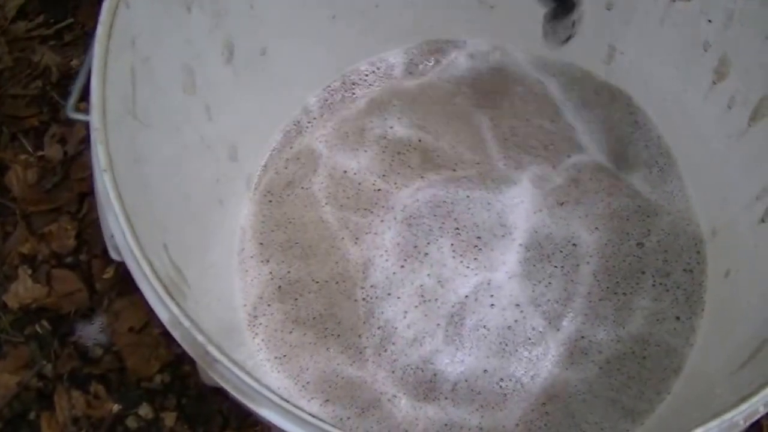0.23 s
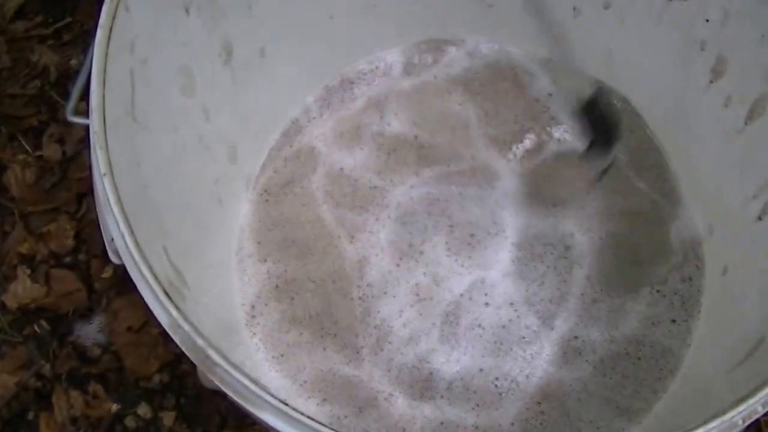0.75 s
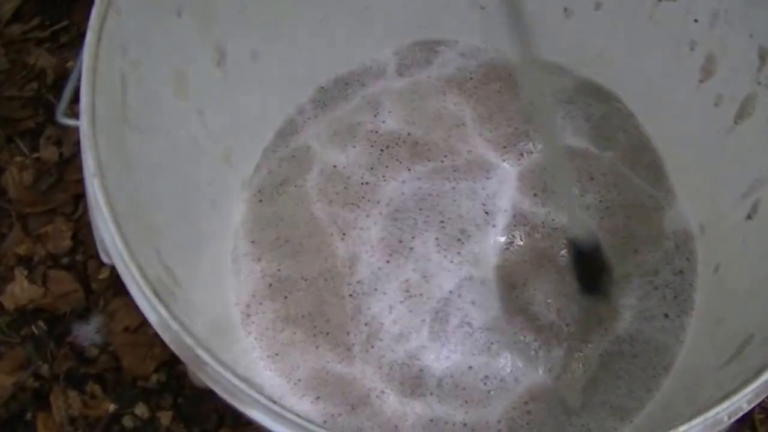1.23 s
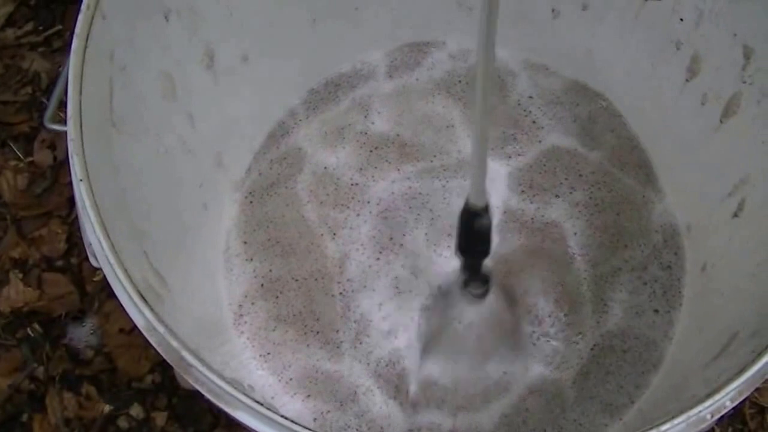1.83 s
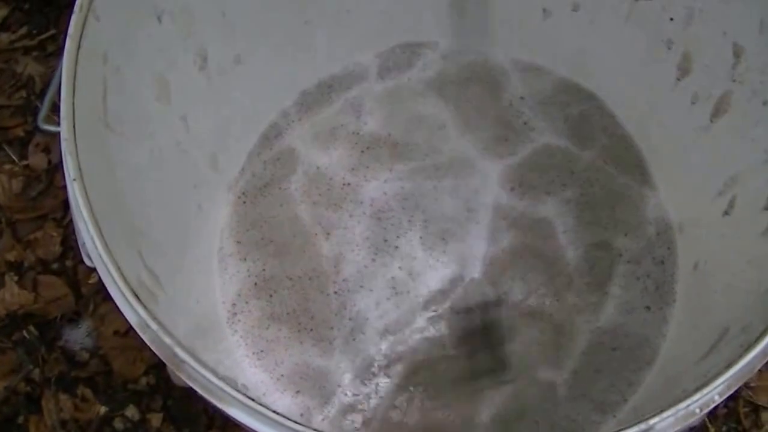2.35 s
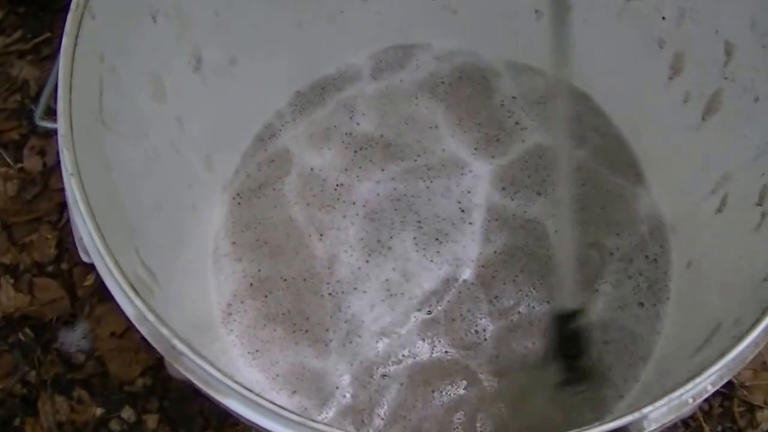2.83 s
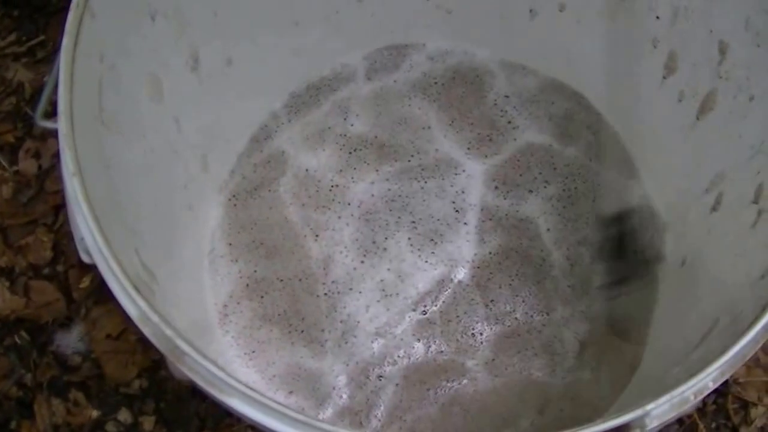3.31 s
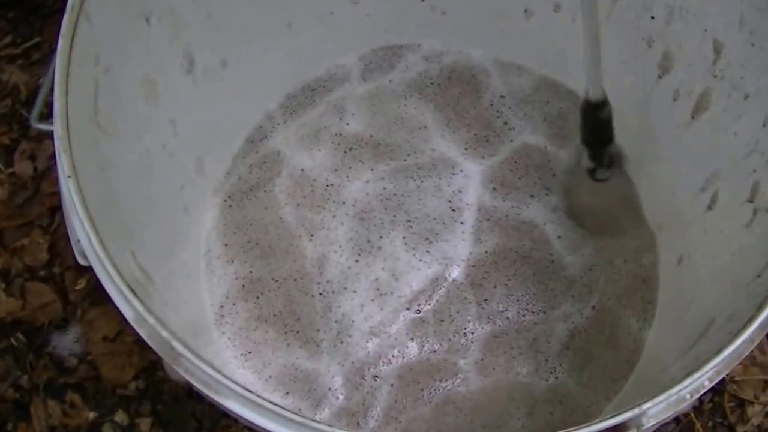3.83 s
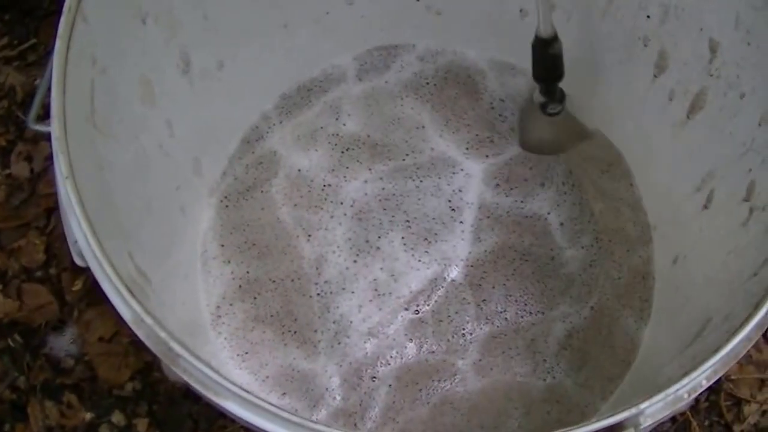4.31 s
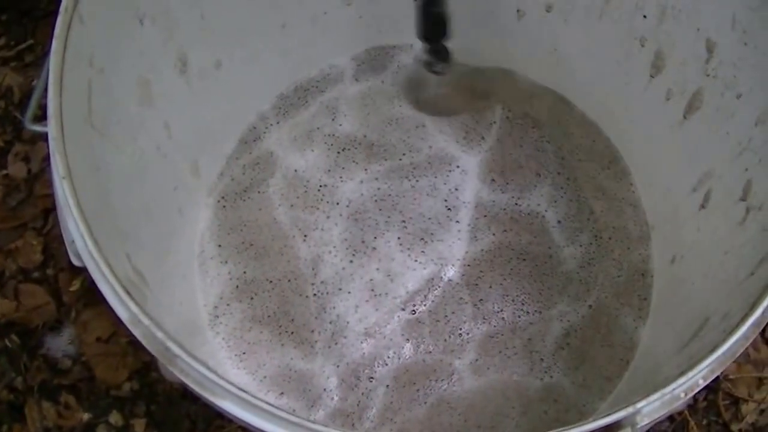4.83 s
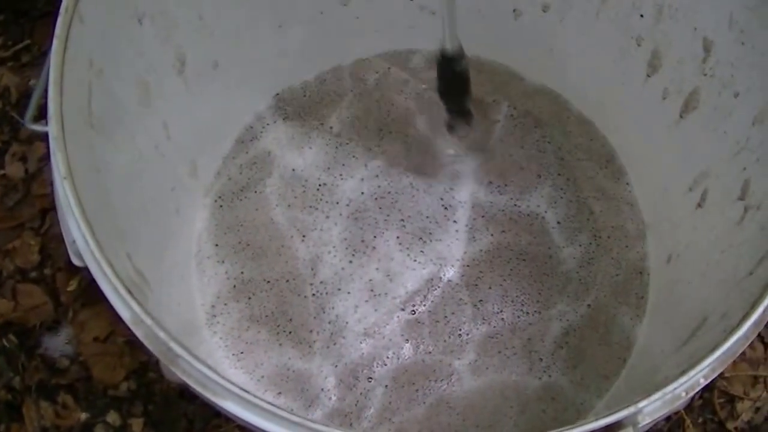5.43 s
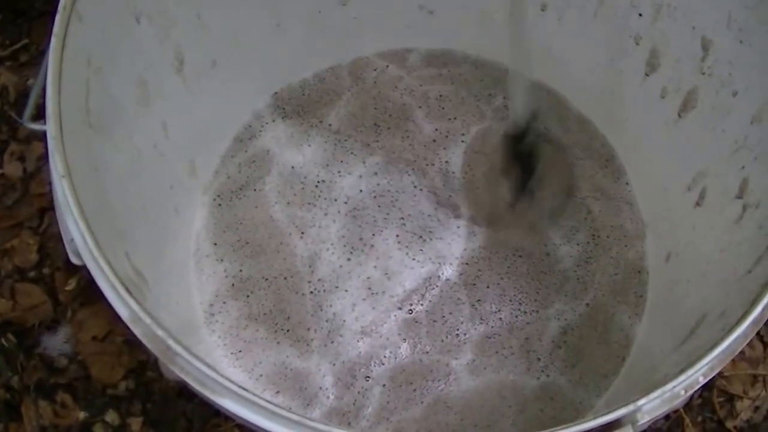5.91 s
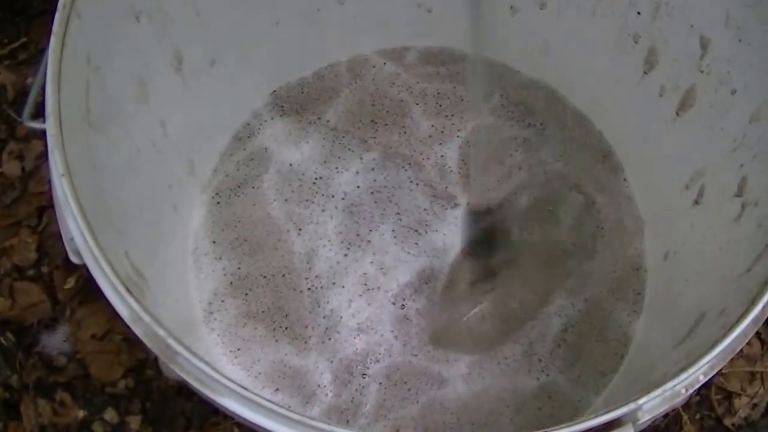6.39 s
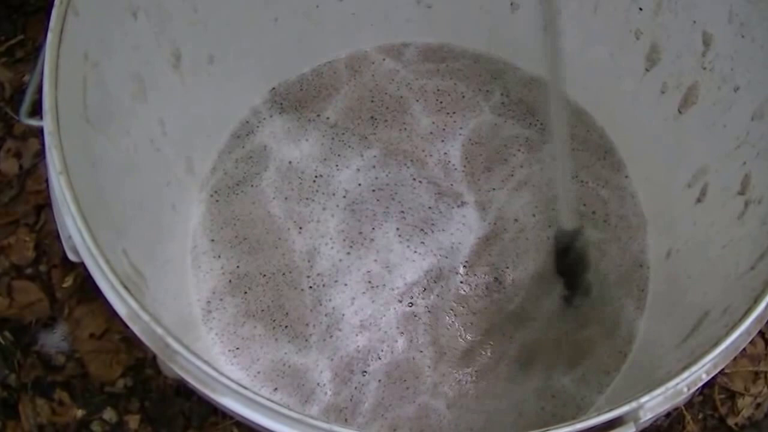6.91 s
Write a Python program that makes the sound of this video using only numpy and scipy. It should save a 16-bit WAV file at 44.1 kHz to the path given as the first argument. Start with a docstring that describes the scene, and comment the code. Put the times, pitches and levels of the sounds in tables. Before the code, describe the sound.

A sprayer jet hisses steadily into frothy water in a plastic bucket, cuts briefly to a spitting leak, then resumes and finally pulses.

```python
"""A pressure sprayer's jet hisses into frothy water in a plastic bucket: drop noise split into four zones of pitch.
The jet digs hollows that resonate as it wanders; its valve shuts to a weak, spitting leak for half a second, then reopens.
Bubbles ring as decaying sines; knocks of the wand ring wall modes; thuds and slaps are bursts of band noise.
At the end the hand shakes the wand, so the hiss swells 6.66 times a second. Quiet outdoor air lies behind."""
import sys
import numpy as np
from scipy import signal
from scipy.fft import rfft, irfft, next_fast_len
from scipy.io import wavfile
from scipy.ndimage import uniform_filter1d, map_coordinates

SR = 44100
rng = np.random.default_rng(int(sys.argv[2]) if len(sys.argv) > 2 else 0)


def bounce(signal):
    """Save signal as a 16-bit WAV file at the path given by the first command-line argument."""
    frames = np.transpose(np.atleast_2d(signal))
    limited = np.clip(frames, -1, 1)
    pcm = np.round(limited * 32767).astype(np.int16)
    wavfile.write(sys.argv[1], SR, pcm)


N = 315315


def amp(db):
    """Decibels to gain."""
    return 10 ** (np.asarray(db) / 20)


def unit(x):
    """Scale to rms 1."""
    return x / np.sqrt(np.mean(x ** 2) + 1e-20)


def along(points, hz):
    """(Hz, value) points read on a log axis."""
    f, v = np.transpose(points)
    return np.interp(np.log(hz + 1), np.log(f + 1), v)


def curves(rows, t):
    """Each column after the time, read at times t."""
    s, *cols = np.transpose(rows)
    return [np.interp(t, s, c) for c in cols]


def wobble(rate):
    """A smooth random curve, rate knots a second."""
    knots = rng.standard_normal(int(N * rate / SR) + 4)
    return map_coordinates(knots, [np.arange(N) * rate / SR])


def filtered(x, response):
    """x times a response of frequency."""
    m = next_fast_len(N + 8192)
    return irfft(rfft(x, m) * response(np.fft.rfftfreq(m, 1 / SR)), m)[..., :N]


def bump(hz, centre, width):
    """A resonance's bell shape, top 1, half at +-width/2."""
    return 1 / (1 + (2 * (hz - centre) / width) ** 2)


def plateau(t, start, end):
    """About 1 from start to end, with soft edges."""
    return np.exp(-((2 * t - start - end) / (end - start)) ** 4)


def burst(envelope, centre_hz, octaves):
    """A puff of noise kept to a band around centre_hz, peak 1."""
    noise = envelope * rng.standard_normal(N)
    x = filtered(noise, lambda hz: bump(np.log2((hz + 1) / centre_hz), 0, octaves) ** 2)
    return x / np.abs(x).max()


# outdoor air spectrum: (frequency [Hz], relative density [dB per Hz])
AIR_SPECTRUM = [(25, -12), (100, 11.5), (200, 16), (280, 28), (600, 37), (2000, -4), (15000, 14.5)]


def outdoors(level_db, rumble_db):
    """A quiet distant rush of air, and a faint rumble that differs between the capsules."""
    air = unit(filtered(rng.standard_normal(N), lambda hz: amp(along(AIR_SPECTRUM, hz))))
    rumble = unit(filtered(rng.standard_normal((2, N)), lambda hz: 1 / (1 + (hz / 220) ** 2)))
    return amp(level_db) * air + amp(rumble_db) * rumble


# rocking of the bucket: (time [s], peak [dB], centre [Hz])
ROCKING_THUDS = [(.137, -56, 292), (.166, -64, 110), (.171, -48, 360), (.283, -50, 450), (1.373, -56, 230),
                 (1.383, -68, 145), (1.424, -62, 191), (1.445, -69, 155), (1.754, -60, 300),
                 (1.883, -48, 500), (1.895, -55, 240)]
THUD_OCTAVES, THUD_RISE_S = 1, 0.0043  # bell width before squaring; time to the envelope's top


def thuds():
    """The full bucket rocks on the ground: soft, low thuds that swell and die."""
    t, out = np.arange(N) / SR, np.zeros(N)
    for s, db, centre_hz in ROCKING_THUDS:
        age = np.maximum(t - s, 0) / THUD_RISE_S
        out += amp(db) * burst(age * np.exp(-age), centre_hz, THUD_OCTAVES)
    return out


# fat drops on the bucket's wall, and at 0.028 s the treble tick of the opening wand knock: (time [s], peak
# [dB], centre [Hz])
WALL_SLAPS = [(.028, -24.5, 2210), (0.054, -24, 4800), (.393, -32, 1150), (.9, -35, 2300),
              (1.726, -27, 5500), (3.053, -34, 5000), (3.862, -37, 2300), (4.343, -30, 2600),
              (5.18, -32, 2300), (5.25, -29, 4600), (5.274, -29, 4600), (5.378, -27, 2700)]
SLAP_DECAY_S, SLAP_OCTAVES = 0.0027, 2.1  # time constant; bell width before squaring


def slaps():
    """Now and then a fat drop lands on the plastic with a short, sharp tick; one such tick also marks the
    opening wand knock."""
    t, out = np.arange(N) / SR, np.zeros(N)
    for s, db, centre_hz in WALL_SLAPS:
        decay = (t > s) * np.exp(-np.abs(t - s) / SLAP_DECAY_S)
        out += amp(db) * burst(decay, centre_hz, SLAP_OCTAVES)
    return out


# wand against bucket: (time [s], gain [dB], deep thump over it [dB], first contact's time constant [s])
WAND_KNOCKS = [(0.0277, -36.5, 15.5, 0.00004), (0.141, -37, -10, .0008), (.169, -31, -14, 0.00035),
               (1.37, -30, -24, 0.00021), (1.429, -39, -15, 0.00016), (1.887, -36, -12, 0.00029),
               (1.903, -33, -15, 0.0003)]
# wall modes: (frequency [Hz], relative level [dB], t60 [s])
WALL_MODES = [(154, -36, 0.09), (240, -33, 0.076), (623, -10, 0.033), (740, -10, 0.089), (900, -1, 0.012),
              (1095, -2, 0.03), (1480, -14, 0.012)]
# modes of the water-loaded base: (frequency [Hz], relative level [dB], t60 [s])
BASE_MODES = [(447, -2.5, 0.049), (520, -15, 0.025)]
BASE_RISE_S = 0.00031  # the heavy base takes a moment to get moving
# the wand chatters: time between contacts, loss and lengthening of each
REBOUND_S, REBOUND_LOSS_DB, REBOUND_SOFTER = 0.0031, 11, 1.8


def ring(modes, t):
    """Sum of decaying modes, each level varied at random by about 1 dB."""
    return sum(amp(db + rng.normal(0, 1) - 60 * t / t60) * np.cos(2 * np.pi * hz * t)
               for hz, db, t60 in modes)


def radiated(x, low_hz, order):
    """Small panels radiate little bass: a high-pass."""
    return signal.sosfilt(signal.butter(order, low_hz, "high", fs=SR, output="sos"), x)


def knocks(count):
    """Each knock swells in the water-loaded base and chatters on the wall, every contact softer and duller."""
    out, t = np.zeros(N + SR), np.arange(SR // 4) / SR
    for s, db, thump_db, contact_s in WAND_KNOCKS:
        wall = radiated(ring(WALL_MODES, t), low_hz=372, order=3)
        swell = 1 - np.exp(-t / BASE_RISE_S)
        base = amp(thump_db) * radiated(ring(BASE_MODES, t) * swell, low_hz=393, order=6)
        for k in range(count):
            push = np.exp(-t / (contact_s * REBOUND_SOFTER ** k))
            struck = wall + (k == 0) * base  # only the first contact moves the base
            blow = signal.fftconvolve(struck, push / push.sum())[:len(t)]
            out[round((s + k * REBOUND_S) * SR):][:len(t)] += amp(db - k * REBOUND_LOSS_DB) * blow
    return out[:N]


# brief squeaks and thin whistles: (start [s], end [s], mean pitch [Hz], mean level [dB])
SQUEAKS = [(0.162, 0.174, 1150, -36), (1.385, 1.485, 2520, -61), (1.424, 1.441, 1080, -48),
           (1.44, 1.494, 1770, -51), (1.474, 1.487, 2330, -53)]


def whistles(waver_hz, flutter_db):
    """The wand and the bucket's air sound in short, unsteady tones."""
    t, out = np.arange(N) / SR, np.zeros(N)
    for start, end, hz, db in SQUEAKS:
        tone = np.sin(2 * np.pi * np.cumsum(hz + waver_hz * wobble(200)) / SR)
        out += amp(db + flutter_db * wobble(130)) * tone * plateau(t, start, end)
    return out


# large bubbles: (time [s], starting pitch [Hz], gain [dB])
LARGE_BUBBLES = [(2.49, 280, -61), (2.635, 330, -52), (2.765, 504, -50), (2.801, 333, -53),
                 (2.855, 490, -46), (2.889, 405, -54), (2.925, 506, -51), (4.042, 260, -63),
                 (4.17, 280, -58)]


def gulps(cycles, rise_per_s):
    """Where the jet digs deep it traps large bubbles, each a low note of slightly rising pitch."""
    out, t = np.zeros(N + SR), np.arange(SR // 12) / SR
    for s, hz, db in LARGE_BUBBLES:
        tone = np.sin(2 * np.pi * hz * t * (1 + rise_per_s * t))
        swell = np.exp(-t * hz / cycles) * (1 - np.exp(-t * hz))
        out[round(s * SR):][:len(t)] += amp(db) * tone * swell
    return out[:N]


def bubbles(count, centre_hz, spread, cycles, level_db):
    """Air driven under by the jet rings as small bubbles of soft start and rising pitch."""
    when = rng.integers(0, N, count)
    pitch, size = rng.standard_normal((count, 2)).T
    hz = np.clip(centre_hz * np.exp(spread * pitch), 400, 7000)[:, None]
    t = np.arange(SR // 40) / SR
    age = t * hz / cycles
    swell = np.exp(-age) * (1 - np.exp(-3 * age))
    tone = np.sin(2 * np.pi * hz * t * (1 + 0.027 * np.minimum(age, 6)))
    rings = amp(8.7 * np.clip(size, -2, 2))[:, None] * swell * tone
    samples = when[:, None] + np.arange(len(t))
    fizz = np.bincount(samples.ravel(), rings.ravel(), N)[:N]
    gain = jet(np.arange(N) / SR)[0]
    return gain * amp(level_db) * unit(fizz)


def drops(rate, size_spread_db, mist_db):
    """Separate drop impacts of random size over countless tiny ones."""
    chance, size, mist = rng.random(N), rng.standard_normal(N), rng.standard_normal(N)
    sign = np.sign(rng.standard_normal(N))
    impacts = (chance < rate / SR) * sign * amp(size_spread_db * np.clip(size, -2, 2))
    return unit(unit(impacts) + amp(mist_db) * mist)


# drops striking the froth: (frequency [Hz], relative density [dB per Hz])
FROTH_SPECTRUM = [(30, -59), (110, -47), (200, -36.5), (400, -25), (700, -11), (1500, -9), (3000, -13),
                  (6500, -9), (10300, -7.5), (12500, -13), (15700, -21.5)]
# air resonances in the bucket: (frequency [Hz], width [Hz], lift [dB])
BUCKET_RESONANCES = [(272, 83, 10), (501, 146, 5), (767, 106, 4), (1060, 460, 5), (1910, 320, 3),
                     (2353, 370, 5), (2996, 740, 5.5), (3485, 390, 5.5), (4736, 1860, 10), (5950, 780, 2.5),
                     (7430, 1200, 2.5)]


def in_bucket(x):
    """The colour of drops on froth, lifted at the bucket's air resonances."""
    def response(hz):
        lift_db = sum(db * bump(hz, c, w) for c, w, db in BUCKET_RESONANCES)
        return amp(along(FROTH_SPECTRUM, hz) + lift_db)
    return unit(filtered(x, response))


# nozzle splutter, and at 0.169 s the treble burst of a wand knock: (time [s], gain [dB], gaussian width [s],
# centre [Hz])
SPLUTTERS = [(.169, -36, 0.0027, 5000), (1.381, -61, .002, 12000), (1.394, -60, .002, 8000),
             (1.428, -56, 0.012, 1100), (1.433, -55, .003, 5500), (1.44, -57, 0.055, 1650),
             (1.4485, -51, 0.0024, 2800), (1.457, -54, .004, 8800), (1.481, -52, .002, 3200),
             (1.608, -49, 0.0034, 1400), (1.682, -40, .003, 2300), (1.763, -43, 0.0045, 2260)]


def spits(spread_octaves):
    """The nozzle splutters: short spurts of coarse drops, each with its own brightness; one such burst also
    marks a wand knock."""
    t, out = np.arange(N) / SR, np.zeros(N)
    coarse = in_bucket(drops(rate=3700, size_spread_db=6, mist_db=1))
    for s, db, width_s, centre_hz in SPLUTTERS:
        spurt = unit(filtered(coarse, lambda hz: bump(np.log2((hz + 1) / centre_hz), 0, spread_octaves)))
        out += amp(db) * np.exp(-.5 * ((t - s) / width_s) ** 2) * spurt
    return out


SHUT_AT_S, SHUT_S, OPEN_AT_S, OPEN_S = 1.054, 0.0079, 1.566, 0.058  # moments and time constants


def valve(t):
    """Share of full flow: it collapses as the valve shuts and builds up again as it opens."""
    closing = np.exp(-np.maximum(t - SHUT_AT_S, 0) / SHUT_S)
    opening = 1 - np.exp(-np.maximum(t - OPEN_AT_S, 0) / OPEN_S)
    return np.minimum(closing + opening, 1)


# jet wandering over the froth, before the voice trims:
# (time [s], overall gain [dB], drumming on water [dB], churning froth [dB], fine mist [dB])
JET_PATH = [(0.0, -39.5, -9.5, -3, -5), (0.37, -37, -11.5, -5.5, -6), (0.75, -41, -10.5, -7, -3.5),
            (1.0, -39.5, -12.5, -7, -3.5), (1.73, -40.5, -10.5, -5.5, -3.5), (1.85, -43, -9.5, -2, -2),
            (2.1, -41.5, -12.5, -4.5, -2), (2.8, -44, -11.5, -3.5, -2.5), (3.0, -41.5, -13.5, -6, -3.5),
            (3.2, -44, -11.5, -4.5, -1.5), (3.3, -40, -14.5, -7.5, -3), (3.83, -38, -14, -8, -4.5),
            (3.97, -39, -11.5, -6.5, -6), (4.35, -41.5, -10.5, -2.5, -3), (4.7, -40.5, -10.5, 1.2, -6),
            (4.93, -42, -10, -2.5, -3), (5.08, -40, -12, -2, -2), (5.15, -38.5, -14.5, -4, -5),
            (5.27, -36, -18, -5, -7), (5.39, -37.5, -13, -5.5, -5.5), (5.65, -40.0, -11.5, -8.5, -2.5),
            (5.95, -42.5, -11.5, -4.5, -3), (6.35, -41, -13.5, -7, -3), (7.15, -44, -11.5, -2.5, -2)]
# leak, fading as the wand drains, reviving as the trigger is squeezed:
# (time [s], level against full flow [dB])
LEAK_LEVEL = [(1.08, -19.5), (1.18, -21), (1.27, -24.5), (1.37, -21.5), (1.56, -20)]
COARSE_DB = 8  # a leak falls in coarse drops: this much more drumming, half as much more churning
SHAKE_FROM_S, SHAKE_PEAK_AT_S = 5.74, 6.19  # start, and the top of one stroke
SHAKE_HZ, SHAKE_DB, SHAKE_GROWS_DB_PER_S = 6.66, 0.4, 0.5


def jet(t):
    """The jet's gain and its drum, churn and mist dB, from where it lands, the valve and the shaking hand."""
    hiss_db, drum_db, churn_db, mist_db = curves(JET_PATH, t)
    flow = valve(t)
    leak = (1 - flow) * amp(curves(LEAK_LEVEL, t)[0])
    coarse_db = COARSE_DB * (1 - flow) ** 2
    swing_db = (t > SHAKE_FROM_S) * (SHAKE_DB + SHAKE_GROWS_DB_PER_S * (t - SHAKE_FROM_S))
    shake_db = swing_db * np.cos(2 * np.pi * SHAKE_HZ * (t - SHAKE_PEAK_AT_S))
    gain = amp(hiss_db + shake_db) * np.hypot(flow, leak)
    return gain, drum_db + coarse_db, churn_db + .5 * coarse_db, mist_db


# hollows dug by the jet, ringing until the froth closes them; the row at 1.38-1.627 s is instead the lance tube
# ringing while the valve is shut: # (start [s], end [s], first pitch [Hz], last pitch [Hz], lift [dB])
RINGING_HOLLOWS = [(.05, 0.598, 1100, 860, 5), (.62, 0.865, 730, 740, 4), (.75, 1.122, 2100, 2250, 5.5),
                   (1.38, 1.627, 1775, 1790, 9), (1.52, 1.663, 520, 520, 15),
                   (1.664, 1.803, 2080, 2270, 10.5), (1.6, 1.8, 4750, 5500, 0.5),
                   (1.96, 2.32, 2160, 2100, 5), (1.972, 2.35, 3200, 3070, 4), (2.222, 2.95, 1210, 1120, 5),
                   (2.62, 3.0, 440, 510, 14), (2.946, 3.547, 1750, 1970, 8), (2.95, 3.403, 3150, 3200, 3.5),
                   (3.507, 4.004, 2100, 2350, 5.5), (3.75, 4.4, 2830, 3360, 3.5), (4.4, 4.9, 1940, 1860, 2),
                   (4.71, 5.05, 1380, 1330, 4), (5.08, 5.438, 4870, 4460, 2), (5.15, 5.55, 5700, 5400, 0),
                   (5.554, 5.95, 3200, 2680, 4.5), (6.1, 6.65, 2180, 2150, 4)]
# wall reflection, pitch set by the nozzle's distance: (time [s], notch [Hz], cut [dB], negative lifts)
WALL_NOTCH = [(0, 2820, -0.5), (1.4, 2880, 0.5), (2.2, 2620, 4.5), (2.4, 2800, -1), (2.5, 3800, -2),
              (3.2, 3770, 3), (3.8, 3840, 2.5), (4.6, 4930, -1.5), (5, 6330, 2.5), (5.5, 4660, 0),
              (5.72, 4000, 9), (5.95, 3520, 4.5), (6.35, 3300, 0.5), (7.15, 2500, 3.5)]
NOTCH_WIDTH = .12  # share of the notch's pitch
# jet grazing the plastic: (time [s], top treble [dB])
GRAZE_TREBLE = [(0, 1.5), (1, -3.5), (1.8, -3), (3.1, -3), (4.2, 1.5), (6, -0.5), (7.15, -4)]


def wander(x, hollow_width, patchy_db):
    """The moving nozzle digs ringing hollows, sweeps a notch and sizzles near the wall; foam adds random patches."""
    hz, t, z = signal.stft(x, SR, nperseg=1024)
    hz = hz[:, None]
    notch_hz, notch_db = curves(WALL_NOTCH, t)
    sizzle_db, = curves(GRAZE_TREBLE, t)
    foam = uniform_filter1d(rng.standard_normal(z.shape), size=7, axis=0)  # smooth in pitch
    foam = unit(uniform_filter1d(foam, size=21, axis=1))  # and in time
    db = sizzle_db * np.clip((hz - 9500) / 3000, 0, 1)
    db = db + patchy_db * foam / (1 + hz / 6000)
    db = db - notch_db * bump(hz, notch_hz, NOTCH_WIDTH * notch_hz)
    for start, end, from_hz, to_hz, lift_db in RINGING_HOLLOWS:
        hollow_hz = np.interp(t, [start, end], [from_hz, to_hz])
        db = db + lift_db * plateau(t, start, end) * bump(hz, hollow_hz, hollow_width * hollow_hz)
    return signal.istft(z * amp(db), nperseg=1024)[1][:N]


# borders of drumming, churning, hiss and mist: (frequency [Hz])
ZONE_BORDERS_HZ = [1370, 2970, 7260]
HISS_DB, DRUM_DB, CHURN_DB, MIST_DB = -1, -1, -1, 0.5  # voice trims


def spray(flutter_db, slosh_db):
    """The jet's drops drum on the water, churn the froth and hiss, by where they land."""
    gain, drum_db, churn_db, mist_db = jet(np.arange(N) / SR)
    impacts = drops(rate=4500, size_spread_db=2.0, mist_db=4.0)
    x = in_bucket(wander(impacts, hollow_width=0.18, patchy_db=1.4))
    below = [filtered(x, lambda hz: 1 / (1 + (hz / edge) ** 8)) for edge in ZONE_BORDERS_HZ]
    zones = np.diff([np.zeros(N), *below, x], axis=0)
    drum, churn, hiss, mist = [unit(zone) for zone in zones]
    slosh = slosh_db * wobble(22)  # the surface heaves under the jet
    wet = amp(DRUM_DB + drum_db + slosh) * drum + amp(CHURN_DB + churn_db + .5 * slosh) * churn
    dry_hiss = amp(HISS_DB) * hiss + amp(MIST_DB + mist_db) * mist
    return gain * amp(flutter_db * wobble(28)) * (wet + dry_hiss)


# scatter off the bucket's wall: (frequency [Hz], side over mid [dB])
WALL_SCATTER = [(100, -20), (300, -25), (600, -28), (1400, -31), (2200, -23), (5000, -18), (6000, -20),
                (8000, -20), (10500, -26), (15000, -25)]
# stereo lean: (frequency [Hz], left over right [dB])
STEREO_LEAN = [(1500, 0), (2000, .7), (3400, 1.1), (5000, .6), (5700, -.2), (7200, .4), (9000, 0)]


def microphones(x):
    """Two close capsules hear nearly the same, but for a little random-phase scatter off the bucket's wall."""
    z = signal.stft(x, SR, nperseg=256)[2]
    random_phase = np.exp(2j * np.pi * rng.random(z.shape))
    scatter = signal.istft(np.sqrt(2) * z * random_phase, nperseg=256)[1][:N]
    side = filtered(scatter, lambda hz: amp(along(WALL_SCATTER, hz)))
    half = np.array([[.5], [-.5]])
    return filtered(np.array([x + side, x - side]), lambda hz: amp(half * along(STEREO_LEAN, hz)))


def scene():
    """Spray, bubbles and knocks over quiet outdoor air."""
    air = outdoors(level_db=-67.5, rumble_db=-89.5)
    bucket = thuds() + slaps() + knocks(count=3)
    deep = gulps(cycles=3.6, rise_per_s=0.84)
    froth = bubbles(count=1500, centre_hz=1909, spread=.45, cycles=18.2, level_db=-21.5)
    nozzle = whistles(waver_hz=32, flutter_db=2.5) + spits(spread_octaves=1.4)
    nozzle = nozzle + spray(flutter_db=0.5, slosh_db=.5)
    return microphones(bucket + deep + froth + nozzle) + air


TOP_HZ = 15850


def record(dry):
    """Nothing passes above the band limit."""
    return filtered(dry, lambda hz: hz < TOP_HZ)


dry = scene()
out = record(dry)
bounce(out)
```